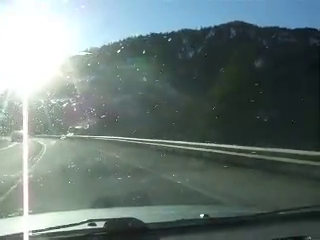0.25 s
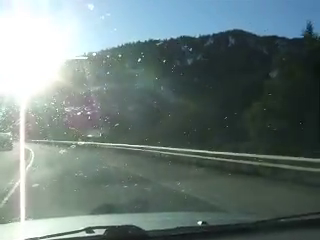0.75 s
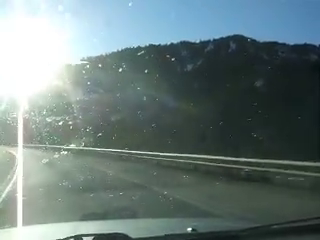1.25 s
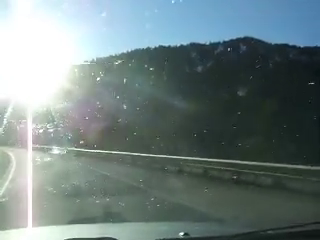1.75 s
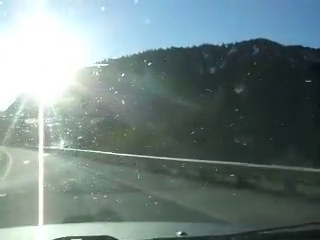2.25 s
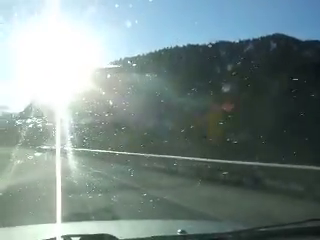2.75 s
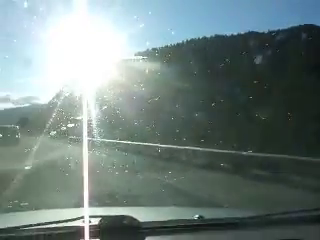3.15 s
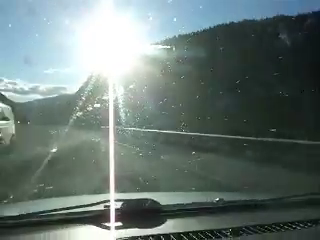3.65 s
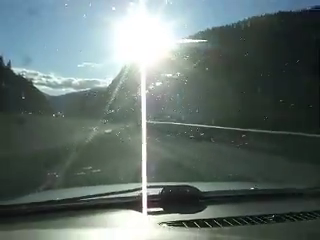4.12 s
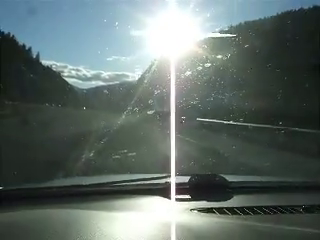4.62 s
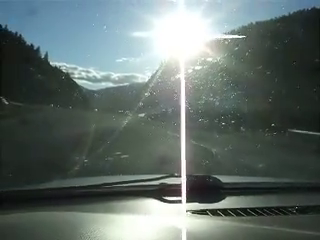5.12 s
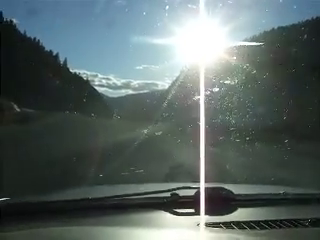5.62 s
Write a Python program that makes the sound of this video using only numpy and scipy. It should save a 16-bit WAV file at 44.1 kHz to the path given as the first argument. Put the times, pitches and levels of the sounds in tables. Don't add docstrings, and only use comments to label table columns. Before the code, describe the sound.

Inside a moving car with a window open, deep slow air throbbing pounds over steady road roar, wind rush and faint gritty hiss.

```python
import sys
import numpy as np
from scipy import signal
from scipy.fft import rfft, irfft
from scipy.io import wavfile
from scipy.ndimage import uniform_filter1d

SR = 44100
rng = np.random.default_rng(int(sys.argv[2]) if len(sys.argv) > 2 else 0)


def boost(x):
    u = np.asarray(x, float) / 20
    return 10 ** u


def file_out(sig):
    cols = np.atleast_2d(sig).T
    lim = np.clip(cols, -1, 1)
    pcm = np.round(lim * 32767).astype(np.int16)
    wavfile.write(sys.argv[1], SR, pcm)


N = 259308


def unit(x):
    return x / np.sqrt(np.mean(x ** 2))


def walk(rate_hz):
    hold = int(SR / rate_hz)
    held = np.repeat(rng.standard_normal(N // hold + 1), hold)
    slewed = uniform_filter1d(uniform_filter1d(held, hold), hold)
    return unit(slewed[:N])


def resonance(hz, width_hz, size=N):
    even_share, even_cycles = 0.7, 1.6
    settle = SR // 2
    sos = signal.tf2sos(*signal.iirpeak(hz, hz / (1.55 * width_hz), fs=SR))
    ringing = signal.sosfilt(np.vstack([sos, sos]), rng.standard_normal(size + settle))
    x = unit(ringing[settle:])
    span = int(SR * max(even_cycles / width_hz, 0.04))
    power = uniform_filter1d(uniform_filter1d(x ** 2, span), span)
    return unit(x / (power + 0.05) ** (even_share / 2))


def layer(modes, gust_db, flow_db, flicker_db, flicker_hz):
    total = np.zeros(N)
    for hz, width_hz, db, lean in modes:
        level_db = db + lean * flow_db + gust_db + flicker_db * walk(flicker_hz)
        total += boost(level_db) * resonance(hz, width_hz)
    return unit(total)


def swell(s, length_s, hz, width_hz, db):
    first = max(int((s - 4 * length_s) * SR), 0)
    last = min(int((s + 4 * length_s) * SR), N)
    shape = np.exp(-0.5 * ((np.arange(first, last) / SR - s) / length_s) ** 2)
    noise = resonance(hz, width_hz, size=SR * 3)[:last - first]
    return np.pad(boost(db) * shape * noise, (first, N - last))


def drive(t):
    # t/s, air flow at the window/dB, road roughness/dB
    drive_points = [(0.0, -0.5, -1), (0.301, 2.5, 2.5), (0.601, -2.5, 0.5), (.9, 1, 0.5), (1.3, 0, 0),
                    (1.52, 0, -2), (1.722, 7, -1), (2.051, -1.5, 0), (2.601, 0.5, -2), (2.9, 2, 3.5),
                    (3.048, 1.5, 2.5), (3.2, 2, 2.5), (3.45, -2.5, 3.5), (4.0, 2.5, 0.5), (4.4, -0.5, 1.5),
                    (4.7, -6, -2), (5.2, -5.5, -1.5), (5.88, -3, -3.5)]
    s, flow_db, road_db = np.transpose(drive_points)
    return np.interp(t, s, flow_db), np.interp(t, s, road_db)


def window_hiss(flow_db, gust_db):
    # f/Hz, width/Hz, level/dB, extra per air flow/(dB/dB)
    hiss_modes = [(1612, 270, -4.5, .02), (1925, 80, -7.5, .02), (2062, 400, -3.5, .02),
                  (2500, 760, -2.5, .02), (3270, 220, -7.5, -.05), (3502, 900, -5, -.05),
                  (4403, 1400, -7.5, .12), (5700, 1800, -9.5, .02), (7180, 1500, -14.5, .02)]
    hiss = layer(hiss_modes, 1.5 * gust_db, flow_db, flicker_db=1.23, flicker_hz=24.98)
    return hiss * boost(-40.5 + 0.9 * flow_db)


def body_boom(flow_db, road_db):
    # f/Hz, width/Hz, level/dB, extra per air flow/(dB/dB)
    boom_modes = [(7.935, 6, -6, .02), (25, 7, -3.5, .02), (40, 9, -0.5, .02)]
    boom = layer(boom_modes, 0, flow_db, flicker_db=0.63, flicker_hz=6)
    return boom * boost(-24.5 + 0.6 * road_db)


def tyre_roar(flow_db, road_db, gust_db):
    # f/Hz, width/Hz, level/dB, extra per air flow/(dB/dB)
    roar_modes = [(50, 7, 1.5, .02), (80, 30, -.5, .05), (114, 16, .5, .02), (155, 30, -11, .05),
                  (187, 36, 0, .05), (235.2, 60, -5.5, .15)]
    roar = layer(roar_modes, 0.66 * gust_db, flow_db, flicker_db=0.55, flicker_hz=16)
    return roar * boost(-24 + road_db + 0.22 * flow_db)


def wind_rush(flow_db, road_db, gust_db):
    # f/Hz, width/Hz, level/dB, extra per air flow/(dB/dB)
    rush_modes = [(275, 40, -10, -.05), (332, 27, -2, -.2), (392.7, 99, 1.5, -.15), (561, 110, -3, .15),
                  (683, 90, -2.5, .25), (780.7, 90, -5, .3), (980, 50, -4.5, .02), (1101, 130, -5.5, .02),
                  (1230, 130, -10.5, .35)]
    rush = layer(rush_modes, 0.83 * gust_db, flow_db, flicker_db=0.96, flicker_hz=22.02)
    return rush * boost(-31 + 0.94 * flow_db + 0.11 * road_db)


def bumps():
    # t/s, length/s, f/Hz, level/dB
    bump_events = [(0.349, .07, 38.1, -21.5), (.85, .07, 36, -22), (1.021, .07, 52, -24.5),
                   (1.951, .06, 42, -21), (2.2, .08, 47.8, -22), (2.949, .05, 35.9, -24),
                   (3.2, .06, 38, -22), (3.549, .04, 45, -21.5), (4.05, .07, 35.94, -22),
                   (4.219, .1, 52.04, -23), (5.7, .06, 48, -27), (4.851, .08, 36.04, -25),
                   (5.299, .1, 36, -26), (3.4, .05, 130, -30), (3.39, .03, 190, -30), (3.27, .05, 95, -31),
                   (.1, .04, 30, -26), (.02, .03, 110, -26), (3.88, .04, 70, -31), (5.5, .06, 65, -31),
                   (.6, .04, 80, -31), (2.33, .06, 115, -29), (5.45, .05, 90, -34), (4.382, .03, 120, -27),
                   (5.15, .04, 209.8, -31), (5.85, .04, 99.6, -30)]
    q = 5
    return sum(swell(s, length_s, hz, hz / q, db) for s, length_s, hz, db in bump_events)


def swishes():
    # t/s, length/s, f/Hz, width/Hz, level/dB
    swish_events = [(0.76, 0.025, 109.5, 56, -18.5), (1.672, 0.083, 202.4, 65, -24),
                    (1.691, 0.055, 2410, 2500, -37), (1.75, 0.05, 730, 170, -28),
                    (1.885, 0.02, 730, 150, -28.5), (1.93, 0.025, 670, 180, -27.5),
                    (1.92, 0.11, 2020, 502, -41.5), (3.305, .08, 173, 80, -25.5),
                    (2.545, 0.22, 302.7, 100.7, -31.5), (2.74, .03, 3250, 1450, -39),
                    (3.617, 0.066, 3320, 687, -43.5), (3.795, 0.018, 3210, 1500, -36.5),
                    (4.03, 0.035, 950, 350, -28), (4.02, .04, 2000, 1000, -41),
                    (1.72, .04, 2600, 1600, -42), (2.03, .06, 620, 200, -37), (4.076, 0.05, 860, 150, -30),
                    (4.374, 0.16, 3160, 815, -45), (4.791, 0.03, 2800, 990, -44),
                    (4.4, 0.09, 3000, 1000, -44), (4.895, 0.018, 127.4, 90, -31),
                    (5.647, 0.039, 2970, 1200, -45.5), (5.775, 0.025, 2500, 700, -45),
                    (5.15, 0.29, 3050, 730, -47), (3.7, .09, 3200, 1400, -45),
                    (1.62, 0.065, 2100, 1600, -41), (1.2, .07, 91, 50, -26.5), (1.63, .06, 690, 200, -30),
                    (1.76, .02, 185, 60, -25), (2.17, .04, 1000, 200, -36), (2.15, .06, 2800, 2500, -45),
                    (3.24, .06, 800, 300, -32), (5.4, .05, 400, 150, -33), (3.82, .03, 480, 150, -31),
                    (2.6, .05, 180, 60, -30), (4.18, .05, 3000, 2500, -44), (.18, .04, 400, 150, -33),
                    (1.38, .05, 1100, 350, -38), (1.9, .06, 1200, 400, -38), (2.95, .08, 380, 150, -30),
                    (2.15, .06, 450, 200, -34), (1.52, .04, 290, 70, -31), (5.07, .04, 110, 50, -28),
                    (3.56, .04, 1100, 500, -38)]
    return sum(swell(*event) for event in swish_events)


def throb(t):
    # tallest crest t/s, length/s, beats since the last one, level after gain control/dB
    buffets = [(0.024, .03, 0, -24.5), (.146, .035, 2, -21), (.209, .04, 1, -19), (.265, .045, 1, -18),
               (.52, .07, 4, -13.5), (.632, .05, 2, -14), (.687, .035, 1, -17), (.772, .025, 2, -21),
               (.856, .03, 2, -20.5), (1.017, .06, 3, -13), (1.185, .11, 3, -17.5), (1.417, .06, 4, -19),
               (1.664, .04, 4, -19), (1.836, .08, 3, -14), (2.073, .05, 4, -23), (2.237, .07, 3, -18),
               (2.355, .04, 2, -22.5), (2.467, .05, 2, -18.5), (2.681, .05, 4, -22), (2.816, .07, 2, -12),
               (2.928, .07, 2, -18), (3.09, .03, 3, -25.5), (3.179, .04, 2, -15), (3.294, .09, 2, -13),
               (3.407, .03, 2, -21), (3.466, .04, 1, -14), (3.677, .05, 4, -17), (3.829, .06, 2, -13.5),
               (3.943, .05, 2, -18), (4.041, .05, 2, -17), (4.146, .03, 2, -19), (4.203, .06, 1, -17),
               (4.325, .04, 2, -21.5), (4.445, .08, 2, -11.5), (4.571, .04, 2, -13), (4.622, .018, 1, -21),
               (4.687, .018, 1, -21), (4.744, .04, 1, -20), (4.801, .04, 1, -17), (4.86, .08, 1, -13.5),
               (5.03, .06, 3, -17), (5.211, .06, 3, -16.5), (5.331, .07, 2, -14.5), (5.446, .05, 2, -15),
               (5.522, .035, 1, -14.5), (5.685, .05, 3, -25), (5.8, .045, 2, -11.5), (5.86, .03, 1, -21)]
    rise_share, fall_share, idle_db, idle_hz = 0.81, 1.1, -33, 17
    s, _, beats, _ = np.transpose(buffets)
    crest_s = np.r_[s[0] - 1, s, s[-1] + 1]
    crest_turns = np.cumsum(np.r_[-idle_hz, idle_hz, np.round(beats[1:]), idle_hz])
    turns = uniform_filter1d(np.interp(t, crest_s, crest_turns), SR // 40)
    level = boost(idle_db) + np.zeros(N)
    for crest, length_s, _, db in buffets:
        spread_s = length_s * np.where(t < crest, rise_share, fall_share)
        level += boost(db) * np.exp(-((t - crest) / spread_s) ** 2)
    return np.sqrt(2) * level * np.cos(2 * np.pi * turns)


def ducking(t):
    # t/s, depth/dB, recovery/s
    ducks = [(0.237, 6.5, 0.1), (.265, 1, .2), (0.546, 4.5, 0.25), (0.58, 2, 0.18), (0.676, 2.5, .08),
             (1.022, 4.5, 0.25), (1.745, 1.5, .15), (1.778, 3, .15), (1.815, 0.5, 0.061), (2.81, 16, 0.16),
             (2.87, 1.5, .2), (3.17, 13.5, 0.15), (3.312, 10.5, .19), (3.816, 8, 0.15), (3.852, 10, 0.11),
             (4.042, 5.5, 0.11), (4.14, 2.5, 0.1), (4.26, 2, .1), (4.399, 3.5, .2), (4.441, 8.5, 0.18),
             (4.501, 6, 0.22), (4.541, 16, 0.2), (4.575, 4.5, .13), (4.635, 4, 0.05), (4.65, 13, .022),
             (4.73, 2.5, .05), (4.8, 5.5, 0.15), (4.908, 6, 0.15), (5.209, 4.5, .1), (5.298, 10, .17),
             (5.408, 1.5, 0.27), (5.798, 7.5, 0.21), (5.831, 2, 0.22)]
    attack_s, recovery_shape = 0.0051, 1.9
    cut_db = np.zeros(N)
    for s, db, back_s in ducks:
        cut_db += db * np.exp(-(np.abs(t - s) / back_s) ** recovery_shape) * (t > s)
    return -uniform_filter1d(cut_db, int(attack_s * SR))


def scene():
    t = np.arange(N) / SR
    flow_db, road_db = drive(t)
    gust_db = 0.5 * walk(14) + 0.8 * walk(32)
    duck_db = ducking(t)
    wind = window_hiss(flow_db, gust_db) + wind_rush(flow_db, road_db, gust_db) + swishes()
    boom = body_boom(flow_db, road_db) * boost(0.45 * duck_db)
    roar = tyre_roar(flow_db, road_db, gust_db) * boost(0.93 * duck_db)
    mix = wind * boost(duck_db) + boom + roar + bumps() + throb(t)
    return mix[None]


def low_pass(x):
    return signal.sosfilt(signal.butter(12, 8850, fs=SR, output="sos"), x)


def record(dry):
    # f/Hz, gain/dB
    converter = [(6500, 0.5), (7600, -0.5), (8000, -4), (8350, -11.5), (8700, -23.5), (8870, -21),
                 (8900, -68)]
    store_hz, step = 16000, 2 ** -7.5
    margin = SR // 100
    rounded = np.tanh(1.465 * dry) / 1.459
    wide = np.pad(rounded, ((0, 0), (margin, margin)), mode="reflect")
    size = wide.shape[1]
    count = size * store_hz // SR
    stored = irfft(rfft(wide)[:, :count // 2 + 1], count) * count / size
    lines = rfft(np.floor(stored / step) * step)
    lines = np.hstack([lines, np.conj(lines[:, -2:0:-1])])
    lines = lines * boost(np.interp(np.arange(count) * SR / size, *np.transpose(converter)))
    played = irfft(lines, size)[:, margin:-margin] * size / count
    soft_start = np.minimum(np.arange(N) * 10 / margin, 1)
    return low_pass(played * soft_start)


dry = scene()
out = record(dry)
file_out(out)
```